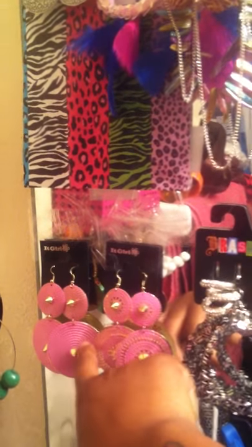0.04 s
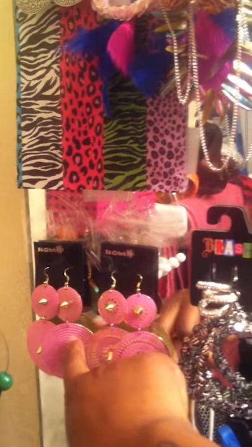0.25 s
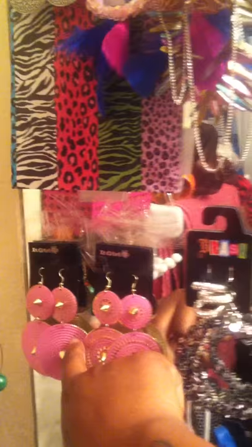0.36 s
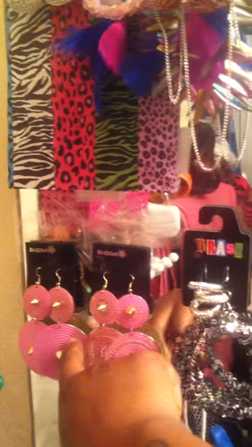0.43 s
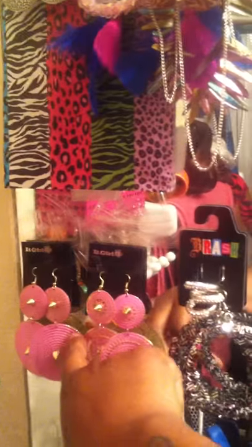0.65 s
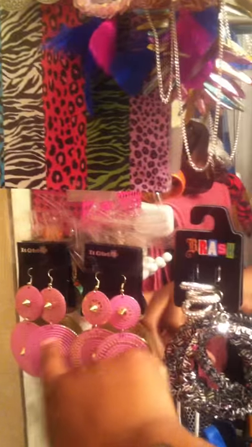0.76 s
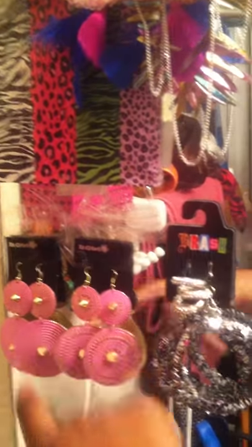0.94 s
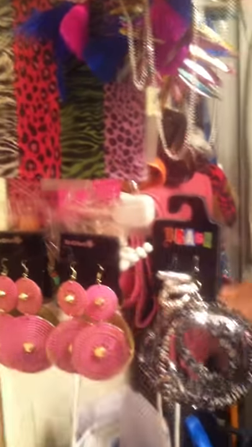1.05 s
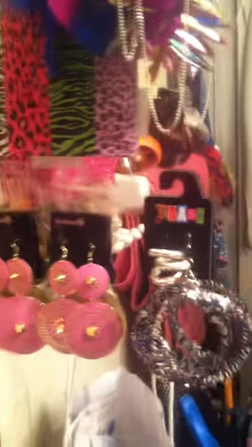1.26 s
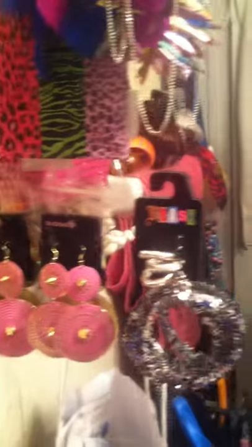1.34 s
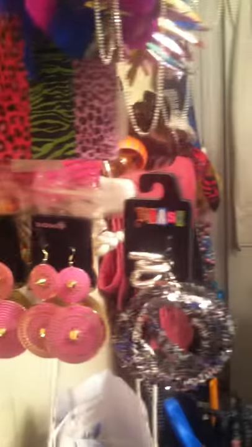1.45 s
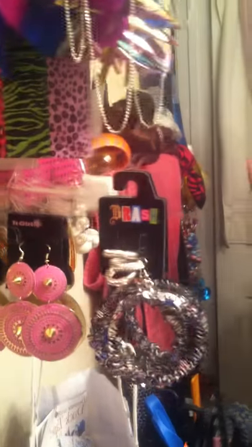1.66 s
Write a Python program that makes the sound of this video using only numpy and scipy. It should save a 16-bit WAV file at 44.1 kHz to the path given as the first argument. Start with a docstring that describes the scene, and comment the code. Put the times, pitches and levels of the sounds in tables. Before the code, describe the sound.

Dangling metal disc earrings rattle and tinkle brightly, then settle, in a quiet room with faint hum

```python
"""A hand jostles thin metal disc earrings on a rack in a quiet room, over a low appliance hum and faint air noise.
Light touches and small blows come first: crowds of short modes clatter, and discs, hoop and chain ring anew.
From about 0.24 s the blows are mostly stronger; a charm joins at 0.8 s and its hook taps as a short ping.
After 1.2 s most blows are weaker and filtered noise makes a soft brushing, the hand on the cards.
From 1.6 s the pieces come to rest and their ringing is quickly damped."""
import sys
import numpy as np
from scipy import signal
from scipy.fft import rfft, irfft, next_fast_len
from scipy.io import wavfile

SR = 44100
rng = np.random.default_rng(int(sys.argv[2]) if len(sys.argv) > 2 else 0)


def unload_audio(sound):
    """Save the sound as a 16-bit wav file, at the path given as the first command line argument."""
    columns = np.transpose(np.atleast_2d(sound))
    # keep every value between -1 and 1, then stretch to whole-number steps
    steps = np.round(np.clip(columns, -1, 1) * 32767)
    wavfile.write(sys.argv[1], SR, steps.astype(np.int16))


N = 74970   # length in samples, 1.7 s
TIME_S = np.arange(N) / SR
TOP_HZ = 16000   # nothing is kept above this


def from_db(db):
    """Turn decibels into a gain."""
    return 10 ** (np.asarray(db) / 20)


def at_hz(points, hz):
    """Read a table of (Hz, value) between its points, along log frequency."""
    table = np.array(points)
    return np.interp(np.log(hz), np.log(table[:, 0]), table[:, 1])


def drift(rate_hz):
    """Make a smooth random wander of spread 1: noise through two equal low-pass steps."""
    r = np.exp(-2 * np.pi * rate_hz / SR)
    wander = signal.lfilter([1], [1, -2 * r, r * r], rng.standard_normal(N + SR))[SR:]
    return wander / wander.std()


def filtered(noise, order, hz, kind):
    """Keep one range of frequencies with a smooth filter."""
    return signal.sosfilt(signal.butter(order, hz, kind, fs=SR, output="sos"), noise)


def ring(clicks, hz, t60_s):
    """Ring one mode: each unit click starts a sine of height 1 that falls 60 dB in t60_s."""
    r = from_db(-60 / (t60_s * SR))
    turn = 2 * np.pi * hz / SR
    # the tiny offset keeps the filter from slowing down on near-zero numbers
    return signal.lfilter([0, np.sin(turn)], [1, -2 * r * np.cos(turn), r * r], clicks + 1e-18)


def clicks_at(start_s, sizes):
    """Place single-sample clicks of the given sizes."""
    out = np.zeros(N)
    out[(start_s * SR).astype(int)] = sizes
    return out


# The colour of the air noise. Each row: frequency in Hz, relative level in dB.
AIR_COLOUR = [(12, -47), (20, 2), (59, -29), (83, -23), (133, 1), (213, -4), (439, -8), (725, -10),
              (1540, -16.5), (3000, -16), (6000, -26.5), (8500, -28), (11500, -37), (13000, -34),
              (15500, -57)]
AIR_DB, AIR_FLICKER_DB = -67.5, 1
HUM_HZ, HUM_DB, HUM_WAVER_DB = 120, -68.5, 3


def background():
    """Add faint air noise, built from flickering half-octave bands, to a wavering mains hum."""
    edges_hz = 20 * 2 ** np.arange(0, 9.9, .5)
    white = rng.standard_normal((2, N + SR))   # neighbouring bands use different noise
    air = 0
    for k, (low, high) in enumerate(zip(edges_hz, edges_hz[1:])):
        band = filtered(white[k % 2], 2, [low, high], "band")[SR:]
        band_db = at_hz(AIR_COLOUR, np.sqrt(low * high)) + AIR_FLICKER_DB * drift(12)
        air = air + band * from_db(band_db)
    hum = from_db(HUM_DB + HUM_WAVER_DB * drift(54)) * np.sin(2 * np.pi * HUM_HZ * TIME_S)
    return from_db(AIR_DB) * air / air.std() + hum


# Narrow noise beside the hum. Each row: frequency in Hz, width in Hz, level in dB.
DRONE_BANDS = [(145.3, 10.6, -74), (231, 9.1, -78)]


def drone():
    """Let noise excite narrow resonances, giving unsteady tones from the same appliance."""
    out = np.zeros(N)
    for hz, width_hz, db in DRONE_BANDS:
        t60_s = np.log(1000) / (np.pi * width_hz)   # a narrower band rings longer
        band = ring(rng.standard_normal(N + SR), hz, t60_s)[SR:]
        out += from_db(db) * band / band.std()
    return out


# Strength of the clatter along pitch. Each row: frequency in Hz, relative level in dB.
CLATTER_COLOUR = [(290, -58), (500, -30), (1820, -18), (2390, -6), (2930, -14), (3530, -8), (4200, -10),
                  (4770, -12.5), (5200, -8.5), (6260, -2), (7340, -15.5), (9500, -22.5), (11900, -23.5),
                  (12700, -28.5), (13700, -38), (14450, -29), (15500, -53)]
# How long the clatter rings before chance. Each row: frequency in Hz, time to fall 60 dB in seconds.
CLATTER_DECAY = [(600, 0.075), (2500, 0.038), (6000, 0.053), (9000, 0.093), (15000, 0.043)]
# Small touches between blows. Each row: time in seconds, relative level in dB, joined by straight lines.
TOUCH_LEVEL = [(0.0, -47.5), (0.052, -43.5), (0.15, -50), (0.2, -78), (0.336, -63), (0.59, -43),
               (0.728, -46), (1.092, -48), (1.182, -44.5), (1.414, -50), (1.566, -48), (1.7, -65.5)]
MODE_COUNT, MODE_SPREAD_DB, T60_SPREAD_DB = 190, 5, 2.5
KNOCK_TOP_HZ, TICK_FROM_HZ = 2200, 8500   # knock below, clatter between, tick above
CLATTER_DB, KNOCK_DB, TICK_DB = -15, 3.5, 2   # one mode, against the level of its part
FOCUS_DB_PER_OCTAVE2 = 7   # the middle part falls off around the centre of each blow
BOUNCES, BOUNCE_SPAN_S = 4, .02
BOUNCE_DB, BOUNCE_LOSS_DB_PER_S, BOUNCE_SPREAD_DB = -6.5, 448, 4.5
TOUCHES_PER_S, TOUCH_DB, TOUCH_SPREAD_DB = 600, -31, 3
RACK_HZ, RACK_T60_S, RACK_DB = 787, 0.2, -14.5   # the rack booms faintly with each knock
THUD_HZ, THUD_T60_S, THUD_DB = 1635, 0.005, 6   # the dull snap under a blow


def clatter(start_s, clatter_db, centre_hz, knock_db, tick_db):
    """Let blows, their bounces and a random patter of touches excite a dense crowd of short modes."""
    blows = len(start_s)
    place = (np.arange(MODE_COUNT) + rng.random(MODE_COUNT)) / MODE_COUNT
    pitches_hz = 500 + (TOP_HZ - 900) * place ** 1.2

    # each blow is a quick run of contacts: the first one, then weaker bounces
    later_s = np.c_[np.zeros(blows), BOUNCE_SPAN_S * rng.random((blows, BOUNCES))]
    bounce_db = BOUNCE_DB - BOUNCE_LOSS_DB_PER_S * later_s
    bounce_db = bounce_db + BOUNCE_SPREAD_DB * rng.standard_normal(later_s.shape)
    weaker_db = (later_s > 0) * bounce_db

    # each blow favours its own modes; every contact pushes up or down by chance
    favoured = from_db(MODE_SPREAD_DB * rng.standard_normal((blows, 1, MODE_COUNT)))
    shares = favoured * np.sign(rng.standard_normal((blows, BOUNCES + 1, MODE_COUNT)))
    lasting = from_db(T60_SPREAD_DB * rng.standard_normal(MODE_COUNT))

    touches = np.flatnonzero(rng.random(N) < TOUCHES_PER_S / SR)
    touch_db = np.interp(TIME_S, *np.transpose(TOUCH_LEVEL)) + TOUCH_DB
    touch_db = touch_db + TOUCH_SPREAD_DB * np.minimum(rng.exponential(1, N), 4)
    touch_sizes = from_db(touch_db)[touches]

    parts = np.zeros((3, N))   # knock, clatter, tick
    for k, hz in enumerate(pitches_hz):
        if hz < KNOCK_TOP_HZ:
            part_db = knock_db + KNOCK_DB
        elif hz > TICK_FROM_HZ:
            part_db = tick_db + TICK_DB
        else:
            part_db = clatter_db + CLATTER_DB - FOCUS_DB_PER_OCTAVE2 * np.log2(hz / centre_hz) ** 2
        sizes = from_db(part_db[:, None] + weaker_db) * shares[:, :, k]
        clicks = clicks_at(start_s[:, None] + later_s, sizes)
        clicks[touches] += touch_sizes * rng.standard_normal(len(touches))
        mode = ring(clicks, hz, at_hz(CLATTER_DECAY, hz) * lasting[k])
        part = int(hz > KNOCK_TOP_HZ) + int(hz > TICK_FROM_HZ)
        # modes made longer by chance start softer, which evens out their energy
        parts[part] += from_db(at_hz(CLATTER_COLOUR, hz)) * mode / np.sqrt(lasting[k])

    out = filtered(parts[0], 2, KNOCK_TOP_HZ, "low")
    out += filtered(parts[1], 4, [KNOCK_TOP_HZ, TICK_FROM_HZ], "band")
    out += filtered(parts[2], 4, TICK_FROM_HZ, "high")

    knocks = clicks_at(start_s, from_db(knock_db) * np.sign(shares[:, 0, 0]))
    out += from_db(RACK_DB) * ring(knocks, RACK_HZ, RACK_T60_S)
    return out + from_db(THUD_DB) * ring(knocks, THUD_HZ, THUD_T60_S)


CRACK_DB, CRACK_T60_S = 1.5, 0.011   # level against the clatter level of the blow


def crack(start_s, clatter_db, centre_hz):
    """Open each blow with a short fading snap at its own centre frequency."""
    out = np.zeros(N + SR)
    t = np.arange(600) / SR
    for start, db, hz in zip((start_s * SR).astype(int), clatter_db, centre_hz):
        fade = from_db(db + CRACK_DB - 60 * t / CRACK_T60_S)
        rise = np.minimum(t * hz / 2, 1)   # two cycles to full height
        out[start:start + len(t)] += fade * rise * np.sin(2 * np.pi * hz * t)
    return out[:N]


SETTLE_S = 0.00071   # smooths each jump to a new level
SCATTER_DB_PER_OCTAVE = 2.5   # chance in the start levels, growing away from the first mode
WAVER_DB, WAVER_DB_PER_OCTAVE, WAVER_HZ = 2.0, 1.5, 40
BRIGHT_FROM_HZ, BRIGHT_MOST_DB = 6600, 7   # bright blows favour the upper modes
STILL_S, STILL_DB_PER_S = 1.6, 500   # the pieces come to rest against the cards


def piece(modes, start_s, ring_db, bright_db):
    """Reset the modes of a piece at each contact, by chance more unevenly far from the first mode.

    Every mode also has a rough random waver in level.
    """
    last = np.clip(np.searchsorted(start_s, TIME_S) - 1, 0, None)   # the latest contact
    since_s = TIME_S - start_s[last]
    smooth = np.exp(-1 / (SETTLE_S * SR))
    chance = rng.standard_normal((len(start_s), len(modes)))
    rest_db = STILL_DB_PER_S * np.clip(TIME_S - STILL_S, 0, None)
    out = np.zeros(N)
    for k, (hz, db, t60_s) in enumerate(modes):
        octaves = abs(np.log2(hz / modes[0][0]))
        start_db = ring_db + db + SCATTER_DB_PER_OCTAVE * octaves * chance[:, k]
        if hz > BRIGHT_FROM_HZ:
            start_db = start_db + np.clip(bright_db, -BRIGHT_MOST_DB, BRIGHT_MOST_DB)
        waver_db = (WAVER_DB + WAVER_DB_PER_OCTAVE * octaves) * drift(WAVER_HZ)
        fade_db = 60 * np.abs(since_s) / t60_s
        level = (since_s >= 0) * from_db(start_db[last] + waver_db - rest_db - fade_db)
        level = signal.lfilter([1 - smooth], [1, -smooth], level)
        out += level * np.sin(2 * np.pi * (hz * TIME_S + rng.random()))
    return out


# Modes of the five pieces, before chance and waver.
# Each row: frequency in Hz, relative level in dB, time to fall 60 dB in seconds.
DISC_ONE_MODES = [(2490, 0, .32), (10640, -28, .2), (12050, -24, .16), (13040, -28, .3), (14430, -24, .15)]
DISC_TWO_MODES = [(2324, 0, .19), (4555, -14, .14), (5450, -8, .09), (5968, -5, .13), (6125, -1, .12),
                  (6790, -3, .14), (7900, -11, .15), (8974, -15, .2), (11210, -17, .1), (13940, -26, .15),
                  (14830, -26, .12)]
HOOP_MODES = [(4753, 0, 1.2), (4958, -3, 1.0), (10200, -6, .6)]
SMALL_DISC_MODES = [(3623, 0, .15), (3483, -6, .12), (5290, -3, .09), (5785, 3, .13), (6178, 1, .12),
                    (6430, -4, .13), (6480, 2, .14), (11890, -20, .1)]
EAR_WIRE_MODES = [(8622, -6, .4), (8629, 0, .5), (9114, -14, .15), (11493, -14, .12), (13388, -22, .2),
                  (7587, -3, .35)]
# The blows between the pieces, as levels before the settings of each part.
# Each row: start in seconds, clatter in dB, clatter centre in Hz, dull knock in dB, bright tick in dB,
# then the ring in dB of disc one, disc two, hoop, small disc and ear wire.
BLOWS = [(0.001, -53, 6800, -68, -79, -59, -60, -82, -65, -93.0),
         (0.0217, -47.5, 5800, -70, -83, -60, -76, -66, -64, -75),
         (0.0558, -71, 5000, -68, -92, -64, -82, -70, -56, -79),
         (0.063, -50, 5600, -81, -88, -64, -80, -89, -76, -72),
         (0.096, -55, 5350, -68, -86, -94, -71, -59.5, -63, -79),
         (0.106, -54, 5940, -70, -66, -80, -77, -77, -65, -69),
         (0.122, -55, 6260, -88, -79, -71, -89, -70, -80, -67),
         (0.14, -54, 6300, -79, -83, -79.0, -89, -70, -70, -77),
         (0.156, -57, 5640.0, -74, -73, -78, -81, -105, -76, -90),
         (0.239, -32.5, 6140, -61.5, -49.5, -57, -49.5, -78, -57, -76),
         (0.263, -47, 5700, -65, -62.5, -82, -63.5, -69, -57.5, -69),
         (0.336, -43.5, 5560, -65, -68, -66, -63, -68, -67, -66.0),
         (0.3398, -39.5, 5450, -70, -60, -60, -82, -61, -66, -50.5),
         (0.37, -33.5, 5250, -54.5, -54, -54.5, -62, -72, -51.5, -48.5),
         (0.447, -55.5, 5770, -87, -72, -62, -67, -87, -83, -58),
         (0.492, -40, 5100, -55, -60, -42.5, -59, -62, -49, -63),
         (0.4966, -31, 5880, -54.5, -49, -54, -48.5, -69, -78, -50),
         (0.518, -39.5, 6800, -64.5, -50, -74, -58, -56.5, -56, -74),
         (0.5821, -41, 6000, -59, -53, -53.5, -91, -58.0, -85, -60.5),
         (0.6015, -47, 5100, -62, -62, -61, -60, -56, -47.5, -55),
         (0.671, -41, 5350, -58.5, -60.5, -68, -56, -53, -76, -47),
         (0.6832, -27.5, 5180, -49.5, -46.5, -48, -77, -76, -45, -50),
         (0.7337, -36.5, 6160, -52, -54.5, -45.5, -49.5, -81, -77, -71),
         (0.7428, -33, 5780, -61, -50.5, -77, -77, -84, -56, -68),
         (0.786, -35.5, 7530, -56.5, -51.5, -66, -73, -68, -61, -63),
         (0.83, -50, 6000, -70, -62, -77, -79, -67, -76, -62),
         (0.86, -55, 6940.0, -65, -66.5, -77.0, -81, -82, -86, -59),
         (0.8782, -30, 5490, -70, -48.5, -45.5, -68, -51, -61, -52),
         (0.9005, -32, 5100, -50, -48.5, -77, -44.5, -47, -39.5, -65),
         (0.913, -28, 5950, -59.5, -43, -45, -84, -61, -50, -46.5),
         (0.9878, -39.5, 5370, -52, -54.5, -59.5, -63, -88, -54.5, -68),
         (1.051, -49.5, 6070, -64, -61, -78, -58, -76, -55.5, -72),
         (1.058, -34, 5350, -56.5, -53, -47, -87, -72, -84, -60),
         (1.066, -34.5, 5240, -84, -91, -68, -54.5, -78, -49, -85),
         (1.1022, -34, 5640, -55, -49.5, -56.5, -72, -57, -60, -54),
         (1.1522, -37.5, 6200, -59.5, -55, -81, -57.5, -76, -53.5, -70),
         (1.174, -45.5, 4870, -71, -66, -53.5, -66, -58, -85, -65),
         (1.195, -44.5, 5800, -60, -66.0, -61, -86, -74, -57, -56.5),
         (1.218, -51, 5700, -63.5, -76, -57, -64, -56, -61, -84),
         (1.2358, -39.5, 6040, -74, -69, -85, -62.5, -79, -56, -77),
         (1.263, -52, 6100, -81, -81, -75, -85, -65, -93, -80),
         (1.281, -48, 5530, -83, -81, -78, -76, -82, -69, -81),
         (1.3034, -48, 5900, -68.5, -77, -66, -80, -62.5, -65, -75.0),
         (1.335, -52, 6460, -67, -85, -80, -71, -75, -86, -80),
         (1.386, -56, 6100, -74, -102, -77, -69, -78, -64.5, -83),
         (1.4235, -35.5, 6140, -69, -59, -62, -51.5, -80, -64, -85),
         (1.44, -57, 5600, -77, -97, -80, -55.5, -90, -82, -78),
         (1.492, -56, 5050, -68, -82, -60, -81, -74, -57, -74),
         (1.499, -52, 5850, -66.5, -74, -68, -77, -64, -84, -61),
         (1.529, -42.5, 6170, -64, -67, -70, -74, -71, -59, -65),
         (1.56, -52, 6130, -67, -86, -89, -66.5, -70, -68, -58.5)]
PLAIN_TICK_DB = -12.5   # tick against clatter in a blow that is neither bright nor dull


def earrings():
    """Let every blow clatter, snap and set the discs, hoop and ear wire ringing anew."""
    start_s, clatter_db, centre_hz, knock_db, tick_db, *rings_db = np.transpose(BLOWS)
    out = clatter(start_s, clatter_db, centre_hz, knock_db, tick_db)
    out = out + crack(start_s, clatter_db, centre_hz)
    bright_db = tick_db - clatter_db - PLAIN_TICK_DB
    pieces = (DISC_ONE_MODES, DISC_TWO_MODES, HOOP_MODES, SMALL_DISC_MODES, EAR_WIRE_MODES)
    for modes, ring_db in zip(pieces, rings_db):
        out = out + piece(modes, start_s, ring_db, bright_db)
    return out


# Modes of the chain. Each row: frequency in Hz, relative level in dB, time to fall 60 dB in seconds.
CHAIN_MODES = [(7125, 0, .3), (6750, -3, .2), (7145, -5, .25), (7585, -6, .3), (12070, -20, .2),
               (14430, -24, .3)]
# Contacts of the chain. Each row: start in seconds, ring level in dB before the mode levels.
CHAIN_HITS = [(.001, -57.5), (.056, -64), (.106, -60.5), (.14, -71), (.239, -57.5), (.34, -75),
              (.4966, -58), (.582, -74), (.6832, -61), (.7428, -60), (.8782, -60), (.913, -49),
              (1.058, -66), (1.1022, -56), (1.195, -76), (1.281, -66), (1.3034, -59), (1.335, -68),
              (1.4235, -66), (1.499, -60), (1.529, -64), (1.56, -57.5)]


def chain():
    """Ring the modes of the chain anew at each of its contacts."""
    return piece(CHAIN_MODES, *np.transpose(CHAIN_HITS), 0)


# Modes of the charm. Each row: frequency in Hz, relative level in dB, time to fall 60 dB in seconds.
CHARM_MODES = [(2825, 0, .25), (6715, -3, .25), (6804, -2, .27), (7424, -9, .3), (7620, -8, .15),
               (7900, -6, .25), (7994, -2, .5), (8188, -7, .25), (10120, -7, .22), (12900, -16, .13)]
# Contacts of the charm. Each row: start in seconds, ring level in dB before the mode levels.
CHARM_HITS = [(0.786, -54), (.832, -59), (.859, -70), (.8784, -81)]
# The charm taps its hook. Each row: start in seconds, level in dB.
HOOK_TAPS = [(0.8324, -50.5), (0.86, -56), (.955, -55)]
PING_HZ, PING_T60_S = 3090, 0.03


def charm():
    """Ring a small charm at its contacts, with a single short mode for each tap on its hook."""
    start_s, db = np.transpose(HOOK_TAPS)
    taps = ring(clicks_at(start_s, from_db(db)), PING_HZ, PING_T60_S)
    return piece(CHARM_MODES, *np.transpose(CHARM_HITS), 0) + taps


# The hand brushes the cards. Each row: time in seconds, level in dB; the gains are joined by straight lines.
RUSTLE_LEVEL = [(1.27, -85), (1.302, -88), (1.324, -69), (1.386, -70.5), (1.4, -83), (1.424, -66.5),
                (1.5, -83)]
RUSTLE_LOW_HZ, RUSTLE_HIGH_HZ, RUSTLE_GRAIN_DB = 560, 1050, 3


def rustle():
    """Make a soft, low brushing from a band of noise with a grainy level."""
    start_s, db = np.transpose(RUSTLE_LEVEL)
    noise = filtered(rng.standard_normal(N), 2, [RUSTLE_LOW_HZ, RUSTLE_HIGH_HZ], "band")
    noise = noise * from_db(RUSTLE_GRAIN_DB * drift(51))
    return noise / noise.std() * np.interp(TIME_S, start_s, from_db(db), left=0, right=0)


ROOM_T60_S, ROOM_DB, WALL_CUT_HZ = 0.2, -17, 3760


def room(x):
    """Echo a sound through eight feedback delays that grow duller on every round."""
    size = next_fast_len(N + SR)
    hz = np.arange(size // 2 + 1) * SR / size
    echo = 0
    for k, lag_s in enumerate(rng.uniform(.008, 0.027, 8)):
        loss = from_db(-60 * lag_s / ROOM_T60_S) / np.sqrt(1 + (hz / WALL_CUT_HZ) ** 4)
        loop = loss * np.exp(-2j * np.pi * hz * lag_s)
        echo = echo + (-1) ** k * loop / (1 - loop)   # the sum of all rounds
    return irfft(rfft(x, size) * echo, size)[:N]


def scene():
    """Put the jewellery in its room, over the brushing and the background."""
    metal = earrings() + chain() + charm()
    in_room = metal + from_db(ROOM_DB) * room(metal)
    return (background() + drone() + in_room + rustle())[None]


MIC_LOW_HZ = 48.4


def record(dry):
    """Lose the deep bass, as a small microphone does, and cut the top steeply."""
    bass_cut = filtered(dry, 2, MIC_LOW_HZ, "high")
    return signal.sosfilt(signal.cheby2(12, 60, TOP_HZ, fs=SR, output="sos"), bass_cut)


dry = scene()
out = record(dry)
unload_audio(out)
```